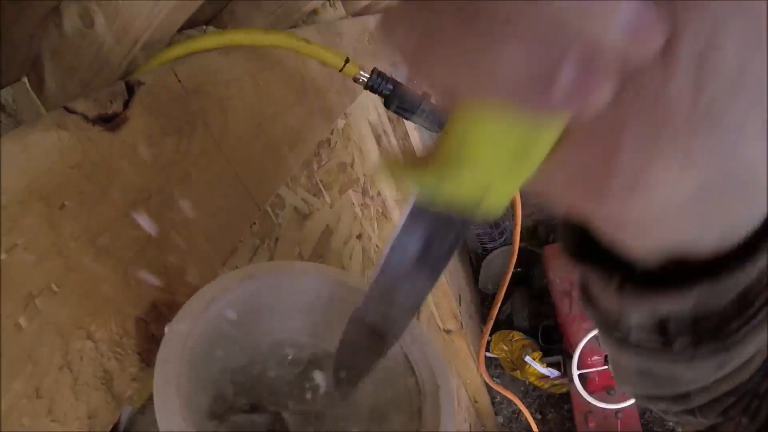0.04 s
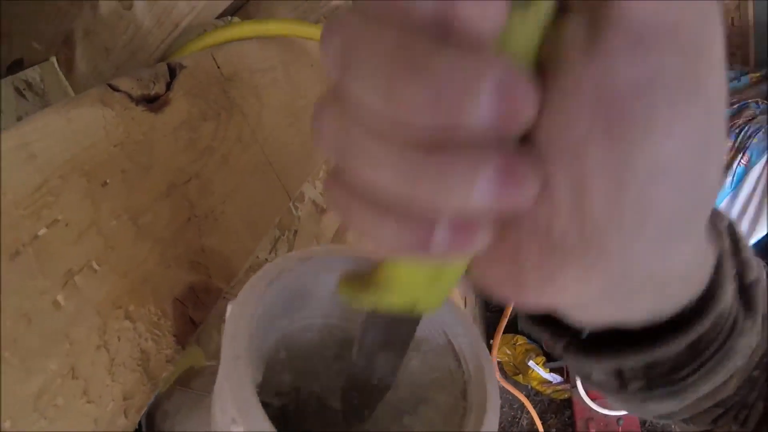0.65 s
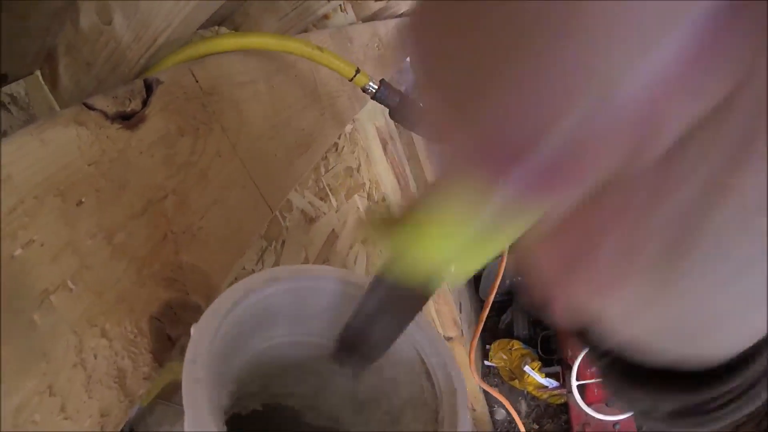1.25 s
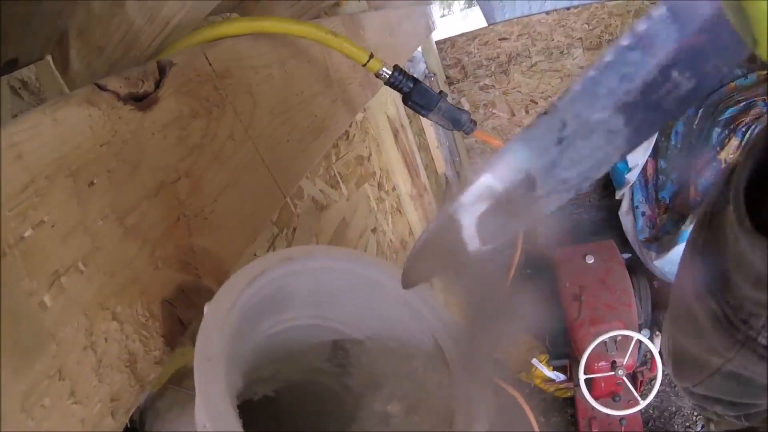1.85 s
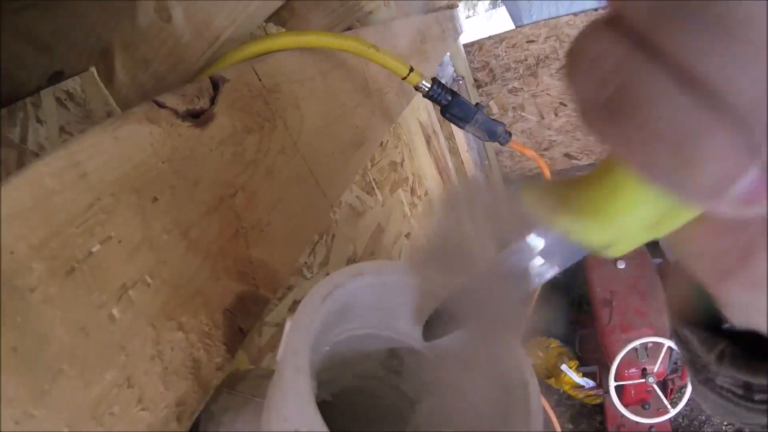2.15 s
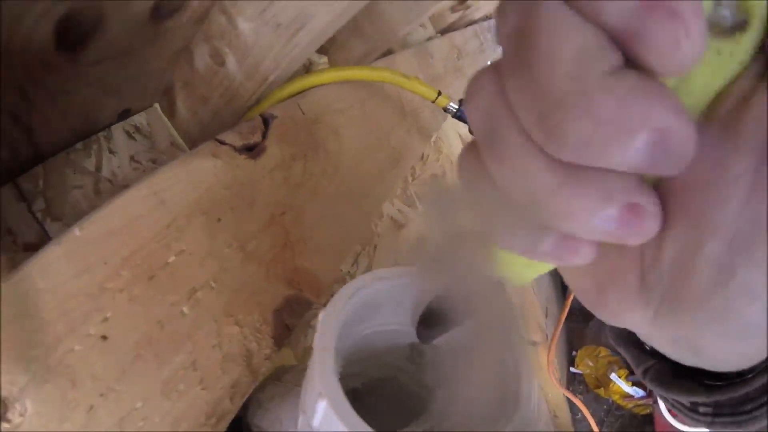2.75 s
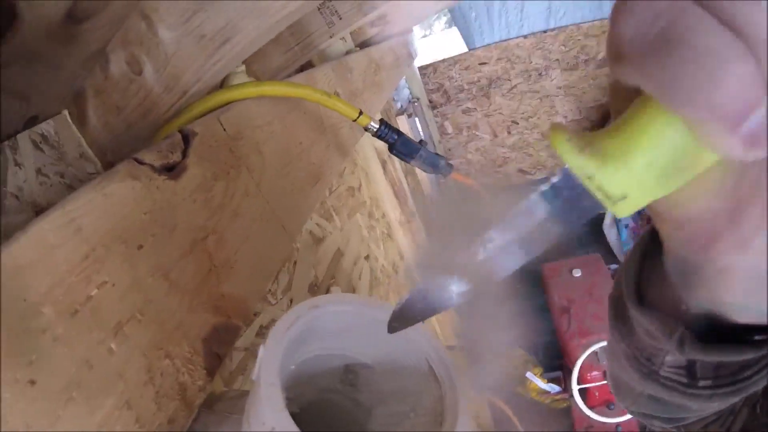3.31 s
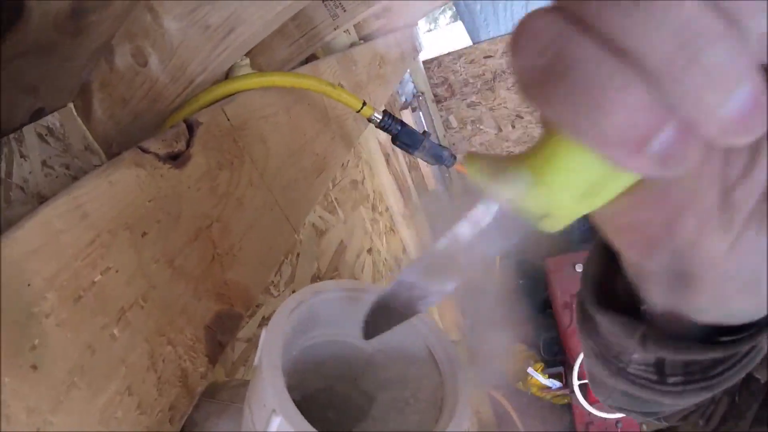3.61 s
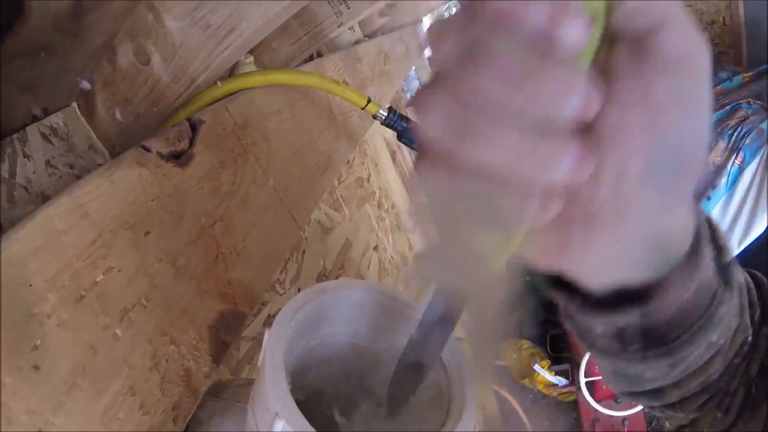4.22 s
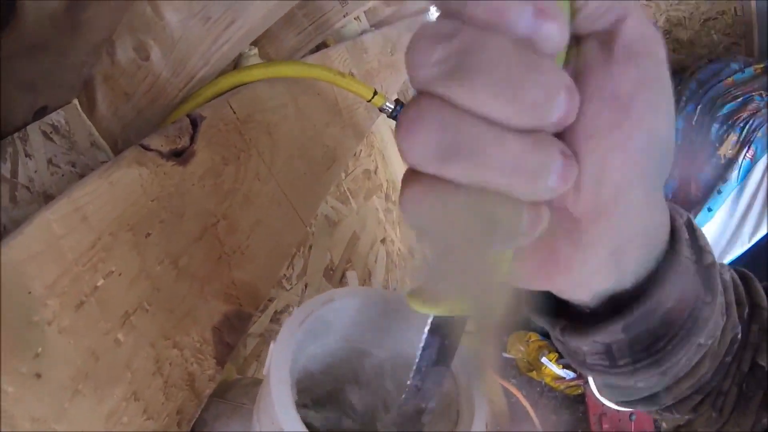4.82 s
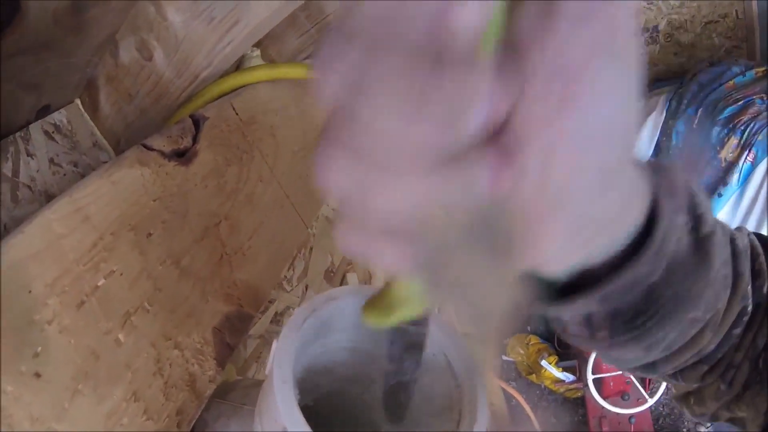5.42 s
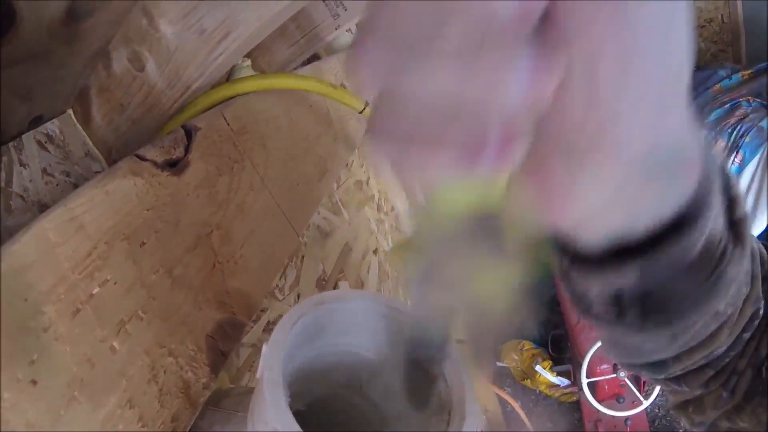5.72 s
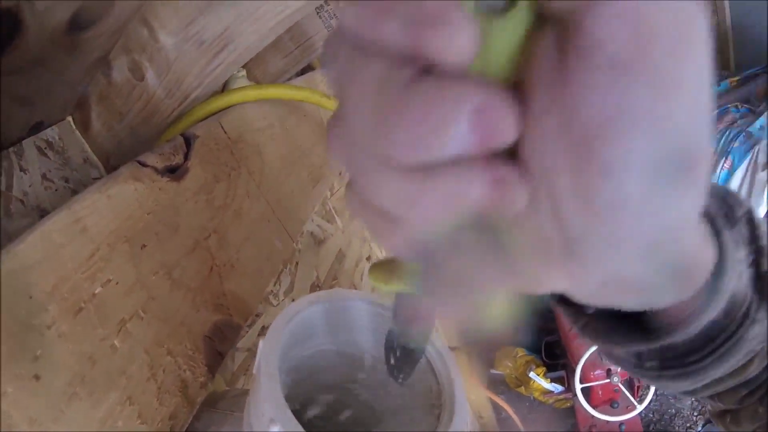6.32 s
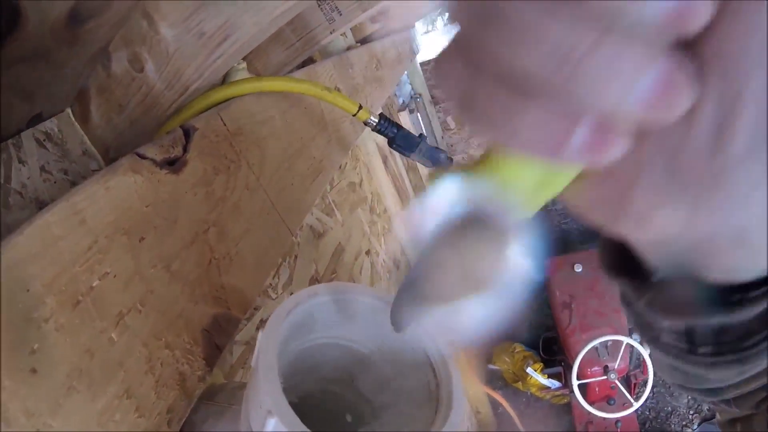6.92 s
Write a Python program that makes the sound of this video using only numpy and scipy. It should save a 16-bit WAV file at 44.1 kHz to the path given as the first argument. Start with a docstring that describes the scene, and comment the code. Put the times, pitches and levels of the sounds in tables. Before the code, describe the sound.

Close to a small camera's microphone in a quiet open shed, ice cracks and crunches under repeated knife stabs, with hollow thumps from its plastic tub and the bench beneath. Chips click and scatter, and the steel gives brief scrapes and squeaks. After seven strikes the work stops for a soft rustle of sleeve, then a longer run follows, with a very faint distant whine coming and going behind it.

```python
"""Quiet air in an open shed; at once a knife starts stabbing ice in a plastic tub on a wooden bench.
Each stab bites and crushes in a burst of tiny fractures, knocks the block and thumps tub and bench;
then splinters patter down. The blade scrapes through loose ice and squeaks as it is pulled free.
In a pause a sleeve rustles; the stabs resume, and a faint far whine comes and goes behind them.
A small camera's housing colours it all."""
import sys
import numpy as np
from scipy import signal
from scipy.fft import rfft, irfft
from scipy.io import wavfile

SR = 44100
rng = np.random.default_rng(int(sys.argv[2]) if len(sys.argv) > 2 else 0)


def put_to_file(sound):
    """Save the sound as 16-bit audio at rate SR, in the file named by the first command-line argument."""
    columns = np.atleast_2d(sound).T  # one column per channel
    safe = np.clip(columns, -1, 1)
    whole_steps = np.round(safe * 32767)
    wavfile.write(sys.argv[1], SR, whole_steps.astype(np.int16))


N = 306936


def undb(db):
    """Decibels to gain."""
    return 10 ** (np.asarray(db) / 20)


def unit(x):
    """Scale to rms 1."""
    return x / np.sqrt(np.mean(x ** 2) + 1e-20)


def add(out, s, x):
    """Mix x into out from time s."""
    i = max(int(s * SR), 0)
    out[i:i + len(x)] += x[:max(N - i, 0)]


def colour(x, points, uneven_db=0, size=4096, count=128):
    """Causal EQ through (Hz, dB) points; uneven_db adds the chance resonances of an irregular piece."""
    hz, db = np.transpose(points)
    f = np.maximum(np.arange(size // 2 + 1) * SR / size, 1)
    bumps = np.interp(f, np.linspace(0, SR / 2, count), rng.standard_normal(count))
    curve_db = np.interp(np.log(f), np.log(hz), db) + uneven_db * bumps
    cepstrum = irfft(np.log(undb(curve_db)))
    cepstrum[1:size // 2] *= 2  # fold to minimum phase: no pre-ring
    cepstrum[size // 2 + 1:] = 0
    return signal.fftconvolve(x, irfft(np.exp(rfft(cepstrum))))[:len(x)]


def drift(n, rate):
    """Random modulation with a spread near 1, gliding to a new value rate times a second."""
    at = np.arange(n) * rate / SR
    return np.interp(at, np.arange(n), rng.standard_normal(n))


def ring(t, hz, t60):
    """One decaying mode."""
    return np.sin(2 * np.pi * hz * t) * undb(-60 * t / t60)


def swell(t, middle, length):
    """A smooth rise and fall."""
    return np.exp(-(2 * (t - middle) / length) ** 2)


# Tone of the open air: (frequency [Hz], level [dB])
AIR_EQ = [(15, -16.5), (28, 8), (90, -3), (200, -14), (600, -17.5), (1600, -25), (4000, -30), (6500, -27),
          (9200, -26.5), (10600, -44), (14000, -55)]


def air():
    """A quiet bed of outdoor air, slowly swelling."""
    return unit(colour(rng.standard_normal(N), AIR_EQ)) * undb(-64 + 2 * drift(N, 4))


# Crisp top layer of breaking ice: (frequency [Hz], level [dB])
ICE_BRIGHT_EQ = [(2500, -58), (3900, -21), (4600, 1), (7000, -0.5), (9200, -3.5), (9900, -14.5),
                 (10700, -25.5), (13000, -37.5), (15000, -94)]
# Crunchy body layer of breaking ice: (frequency [Hz], level [dB])
ICE_BODY_EQ = [(120, -1.5), (350, -6.5), (650, -8), (1050, -8), (1550, 1.5), (1950, 0), (2800, 1.5),
               (3400, -1), (3900, 1.5), (4700, -12), (7000, -29.5)]
UNEVEN_DB = 2.5  # how strongly each piece of ice rings at its own pitches


def fracture(length, bright_db, body_db, change_db, grain_db, bright_t60, body_t60, rise_s,
             uneven_db=UNEVEN_DB, count=96, gap_s=.003, fall_db_per_s=2200.5):
    """A run of tiny, sudden breaks while the ice gives way; top and body then each die at their pace."""
    t = np.arange(int((length + body_t60) * SR)) / SR
    gaps = rng.uniform(.3, 1.7, count)
    sizes = np.clip(rng.standard_normal(count), -1.5, 1.5)
    starts = gap_s * (np.cumsum(gaps) - gaps)
    pressed = np.minimum(t, length)
    latest = np.searchsorted(starts, pressed, side="right") - 1
    age = pressed - starts[latest]
    force = undb(change_db * pressed / length + grain_db * sizes[latest] - fall_db_per_s * age)
    force *= 1 - np.exp(-t / min(rise_s, length / 5))  # pressure builds as the point digs in
    out = 0
    for eq, db, t60 in (ICE_BRIGHT_EQ, bright_db, bright_t60), (ICE_BODY_EQ, body_db, body_t60):
        grains = rng.standard_normal(len(t)) * force * undb(-60 * (t - pressed) / t60)
        burst = colour(grains, eq, uneven_db, size=1024)
        out = out + burst * undb(db) / np.sqrt(np.mean(burst[t < length + .001] ** 2))
    return out


def snap(length, bright_db, body_db):
    """One piece breaks; the smallest snaps are the driest."""
    t60 = min(.011 + 3.7 * length, .036)
    return fracture(length, bright_db, body_db, change_db=-3.5, grain_db=3, bright_t60=t60,
                    body_t60=1.43 * t60, rise_s=.00026, uneven_db=1.23 * UNEVEN_DB)


# Knife hits, which also cue the knocks, thumps and splinters: (time [s], crush length [s],
# bright level [dB], body level [dB], bite over crush [dB], thump [dB], boom [dB], splinters [dB])
STABS = [(.078, .028, -27.5, -32.5, 3, -37, -46.5, -49.5), (.377, .023, -24, -31, -6, -43.5, -50.5, -44.5),
         (.688, .021, -27.5, -32, 1.5, -45, -52.5, -51), (1.045, 0.019, -30.5, -33.5, 6, -35, -43.5, -52),
         (1.376, .02, -27, -32, 7.5, -41.5, -57, -51), (1.705, 0.0099, -37.5, -32.5, 3, -34, -32.5, -52.5),
         (2.089, 0.0038, -35, -27, 4, -32, -33.5, -62), (3.509, 0.025, -33, -36, 8, -54, -58, -52),
         (3.838, .031, -34, -37, -6.5, -42.5, -48, -62.5), (4.213, .022, -25.5, -32, 0, -40, -52, -46.5),
         (4.581, 0.036, -27, -32.5, -0.5, -40.5, -48, -57.5), (4.913, .023, -26, -29, 2, -32.5, -40, -55.5),
         (5.227, .021, -25, -32, -9, -42, -44, -55), (5.521, 0.04, -26.5, -33.5, -7, -37.5, -44, -48.5),
         (5.848, .018, -25.5, -30, -6, -39.5, -46, -64), (6.115, 0.0099, -25.5, -30, -10, -38, -44, -62),
         (6.401, .009, -25, -33, 4, -41, -45, -69.5),
         (6.656, 0.0098, -33.5, -36.5, -3.5, -34, -37.5, -67.5),
         (6.925, 0.0089, -36, -34.5, 6.5, -29, -36.5, -47)]


def stabs(graze_s=.0025, graze_db=-27, bite_s=.0031, bite_body_db=-4):
    """The tip grazes loose frost, bites with a thin snap and crushes the ice."""
    out = np.zeros(N)
    for s, length, bright_db, body_db, bite_db, *_ in STABS:
        add(out, s - graze_s, snap(graze_s, bright_db + graze_db, body_db + graze_db))
        add(out, s, snap(bite_s, bright_db + bite_db, body_db + bite_db + bite_body_db))
        sag_db = -2.5 - .28 * bite_db  # the crush fades more after a hard bite
        add(out, s, fracture(length, bright_db, body_db, change_db=sag_db, grain_db=3,
                             bright_t60=.039, body_t60=.043, rise_s=.0012))
    return out


# Modes of the tub's wall and hollow: (frequency [Hz], gain [dB], decay to -60 dB [s])
TUB_MODES = [(579.7, 0.5, 0.2), (971, -5, 0.27), (1370, -3, 0.055), (1613, -2.5, 0.063), (1960, -8, 0.27),
             (2720, -3, 0.17), (2940, -2.5, 0.21)]


def tub(x):
    """The plastic wall and the hollow above the ice ring on after each crack."""
    t = np.arange(SR // 5) / SR
    response = sum(undb(db) * ring(t, hz, t60) * 2 * np.log(1000) / (t60 * SR)
                   for hz, db, t60 in TUB_MODES)
    return x + signal.fftconvolve(x, response)[:N]


def shed(x, t60=.18, wet_db=-19, gap_s=.007):
    """Boards close by return a short reverb tail."""
    t = np.arange(SR // 2) / SR
    tail = rng.standard_normal(len(t)) * undb(-60 * t / t60) * (1 - np.exp(-(t / gap_s) ** 2))
    echo = signal.fftconvolve(x, unit(tail) / np.sqrt(len(t)))[:N]
    return x + undb(wet_db) * colour(echo, [(200, 19.5), (1500, 1), (3000, 4), (6000, -6), (11000, -5.5)])


# Pings of ice plates: (time [s], pitch [Hz], level [dB], decay to -60 dB [s])
PLATE_PINGS = [(.093, 1514, -34, 0.044), (.392, 2185, -31.5, 0.065), (1.39, 2930, -36.5, 0.087),
               (1.493, 2706, -31, .045), (1.707, 2784, -35, .08), (1.846, 1968, -42.5, .12),
               (2.089, 3765, -19.5, .021), (2.089, 933, -19.5, 0.02), (2.089, 616, -26.5, 0.03),
               (2.288, 1390, -42.5, 0.032), (4.603, 2736, -28.5, .055), (4.6, 625, -35.5, 0.083),
               (4.916, 1645, -18.5, 0.037), (5.852, 1556, -23, 0.054), (6.576, 1350, -44.5, 0.046),
               (6.931, 1790, -20.5, 0.011)]


def plates():
    """Struck plates of ice ring briefly, with a rough flutter."""
    out, t = np.zeros(N), np.arange(SR // 4) / SR
    for s, hz, db, t60 in PLATE_PINGS:
        add(out, s, undb(db) * ring(t, hz, t60) * (1 + .46 * drift(len(t), 300)))
    return out


# Hollow tone of the ice block: (frequency [Hz], level [dB])
KNOCK_EQ = [(150, -13), (330, -4.5), (550, 1.5), (950, -5), (1300, -4.5), (2500, -30), (5000, -64.5)]
STOP_SHARE = .6  # how far through the crush the blade meets solid ice


def knocks(t60=.087, trim_db=-2.5, steepness=1.22):
    """The blade meets solid ice and the whole block knocks; the knock grows faster than the boom."""
    out, t = np.zeros(N), np.arange(SR // 4) / SR
    hardest_db = max(boom_db for *_, boom_db, _ in STABS)
    for s, length, *_, boom_db, _ in STABS:
        knock = colour(rng.standard_normal(len(t)) * undb(-60 * t / t60), KNOCK_EQ, UNEVEN_DB)
        db = hardest_db + trim_db + steepness * (boom_db - hardest_db)
        add(out, s + STOP_SHARE * length, knock * undb(db) / np.std(knock[t < .02]))
    return out


# Modes of tub and bench together: (frequency [Hz], level [dB], decay to -60 dB [s])
BENCH_MODES = [(129.3, -9, 0.5), (162.24, 5, 0.33), (177, -0.5, 0.27), (228, -2.5, 0.14),
               (282.4, -4.5, 0.24), (340, -13.5, 0.11), (435, -15.5, 0.25), (567, -11, 0.22)]
# Low end of the boom, and of the camera's rumble: (frequency [Hz], level [dB])
BOOM_EQ = [(15, -34.5), (30, -5), (55, 2), (85, 2.5), (130, -2), (190, -3), (300, -15.5), (600, -25.5),
           (1200, -62)]


def thumps(lag_s=.004, push_s=.0025, boom_t60=.6):
    """The stopped blade shoves tub and bench: their modes ring over a loose, low boom."""
    out, t = np.zeros(N), np.arange(SR * 3 // 4) / SR
    for s, length, *_, thump_db, boom_db, _ in STABS:
        chance = rng.standard_normal((len(BENCH_MODES), 2))
        modes = sum(undb(db + 2.97 * accent) * ring(t, hz * (1 + .029 * detune), t60)
                    for (hz, db, t60), (accent, detune) in zip(BENCH_MODES, chance))
        modes *= 1 - np.exp(-t / push_s)
        modes *= undb(thump_db) / np.std(modes[t < .08])
        boom = colour(rng.standard_normal(len(t)) * undb(-60 * t / boom_t60), BOOM_EQ)
        boom *= undb(boom_db) / np.std(boom[t < .12])
        add(out, s + lag_s + STOP_SHARE * length, modes + boom)
    return out


def splinters(count=20, fall_s=.26, spread_db=5, fade_db_per_s=52, clink_hz=3580, clink_db=-1.5):
    """Splinters patter down after each stab, ever more softly; heavier ones clink lower."""
    out, t = np.zeros(N), np.arange(SR // 10) / SR
    for s, length, *_, spray_db in STABS:
        delays = fall_s * (np.arange(count) + rng.random(count)) / count
        for delay, (size, weight) in zip(delays, np.clip(rng.standard_normal((count, 2)), -2, 2)):
            db = spray_db - fade_db_per_s * delay + spread_db * size
            tick = fracture(.0025, db, db - 7.5 + 3 * weight, change_db=-4, grain_db=.5,
                            bright_t60=.055, body_t60=.043, rise_s=.00019)
            clink = undb(db + clink_db) * ring(t, clink_hz * 2 ** (-.5 * weight), t60=.04)
            add(out, s + length + delay, tick)
            add(out, s + length + delay, clink)
    return out


# Single clicks of ice: (time [s], length [s], bright level [dB], body level [dB])
CHIP_CLICKS = [(0.137, 0.0078, -45, -49.5), (0.158, 0.0089, -44.5, -62.5), (0.479, 0.0026, -33, -39),
               (.536, 0.0043, -37.5, -49), (0.6, 0.0084, -39, -52), (0.68, .003, -46, -50),
               (.789, .004, -41, -43.5), (.796, 0.0029, -34, -39), (.901, .014, -54, -64),
               (1.066, 0.0081, -39.5, -33), (1.125, .002, -42, -48), (1.489, 0.0083, -44, -39.5),
               (1.546, .005, -68, -48), (1.647, 0.0055, -46, -49.5), (1.923, 0.0091, -54.5, -54.5),
               (1.961, .007, -56, -50), (2.219, .004, -68, -54), (2.253, .005, -53, -57),
               (2.285, 0.0033, -56, -47), (2.416, 0.0091, -57, -51.5), (3.089, 0.0044, -67, -50),
               (3.129, .009, -57.5, -61), (3.524, 0.0023, -30.5, -34.5), (3.597, 0.00079, -48, -45.5),
               (3.634, .007, -50, -64), (3.886, 0.0058, -47.5, -42), (4.257, .003, -31, -45),
               (4.273, 0.0017, -26, -44), (4.291, 0.0012, -28.5, -38.5), (4.323, 0.008, -35.5, -43.5),
               (4.338, 0.0035, -36, -44), (4.417, 0.0066, -45, -54.5), (4.542, 0.009, -44.5, -54.5),
               (4.691, .012, -32.5, -40), (4.75, 0.01, -46, -50.5), (4.863, .005, -52, -51),
               (5.088, 0.0074, -29, -44.5), (5.294, .002, -37, -43.5), (5.3, .004, -32, -43),
               (5.428, 0.0087, -50.5, -66), (5.563, 0.0076, -38, -46), (5.63, 0.0049, -36.5, -44.5),
               (5.745, 0.016, -48, -62.5), (5.906, 0.018, -45.5, -46), (6.161, 0.0083, -46.5, -50),
               (6.576, 0.011, -57.5, -47.5)]


def chips():
    """Chips of ice click as they snap off or land."""
    out = np.zeros(N)
    for s, length, bright_db, body_db in CHIP_CLICKS:
        add(out, s, snap(length, bright_db, body_db))
    return out


# Drags of the blade: (time [s], length [s], bright level [dB], body level [dB])
SCRAPES = [(1.085, 0.05, -55, -51), (1.75, .037, -68, -49), (1.829, .048, -55.5, -46.5),
           (2.55, .024, -53, -42), (2.618, 0.032, -58.5, -58.5), (3.665, .06, -56.5, -67),
           (4.24, .022, -40, -37.5), (4.461, 0.029, -52, -53.5), (5.025, 0.0186, -56, -59),
           (5.111, 0.054, -57, -60.5), (5.31, 0.018, -44, -50), (6.687, 0.038, -59, -54.5)]


def scrapes():
    """The blade drags through loose ice in a coarse run of tiny breaks."""
    out = np.zeros(N)
    for s, length, bright_db, body_db in SCRAPES:
        add(out, s, fracture(length, bright_db, body_db, change_db=-.5, grain_db=4.5,
                             bright_t60=.056, body_t60=.069, rise_s=.0015, uneven_db=3))
    return out


# The blade rubs in its cut; a negative scoop starts sharp, a negative sag rises:
# (time [s], length [s], slip rate [Hz], scoop [share of rate], sag [share of rate], level [dB])
SQUEAKS = [(1.152, 0.054, 1340, 0.26, .1, -44.5), (1.203, 0.059, 900, -.14, .09, -45.5),
           (2.114, 0.042, 1300, 0.062, -.04, -42.5), (2.551, 0.039, 1396, 0.067, 0.0091, -40)]
# Resonances of the blade: (frequency [Hz], level [dB])
BLADE_EQ = [(400, -19), (850, -10), (1300, 7), (1800, -5), (2600, 1.5), (3700, -2.5), (5000, -15),
            (9000, -18.5), (12000, -52)]


def squeaks(jitter=.022, grit=.75, flutter_db=3, settle_s=.007, attack_s=.012, release_s=.02):
    """Steel sticks and slips on ice: a gliding harmonic tone, gritty at each slip, shaped by the blade."""
    out = np.zeros(N)
    for s, length, hz, scoop, sag, db in SQUEAKS:
        t = np.arange(int(length * SR)) / SR
        slip_hz = hz * (1 - scoop * np.exp(-t / settle_s) - sag * t / length)
        phase = 2 * np.pi * np.cumsum(slip_hz * (1 + jitter * drift(len(t), 668))) / SR
        tone = unit(sum(np.sin(k * phase) for k in range(1, 7)))
        rasp = unit(rng.standard_normal(len(t)) * (1 + np.cos(phase)))
        grip = np.minimum(t / attack_s, 1) * np.minimum((length - t) / release_s, 1)
        squeak = unit(colour(tone + grit * rasp, BLADE_EQ))
        add(out, s, squeak * grip * undb(db + flutter_db * drift(len(t), 150)))
    return out


# Arm moves: (peak time [s], length [s], swish level [dB], rumble level [dB])
ARM_MOVES = [(2.42, 0.26, -68.5, -59.5), (2.79, 0.49, -55, -54), (2.971, 0.079, -57, -74),
             (3.15, 0.2, -64, -60), (3.39, 0.17, -77, -63.5)]
# Tone of sliding cloth: (frequency [Hz], level [dB])
CLOTH_EQ = [(200, -11), (450, -4), (820, -6), (1100, -5.5), (1700, -5), (2600, -14), (3300, -13.5),
            (5400, -14.5), (7000, -15.5), (9300, -21.5), (10500, -44), (14000, -56)]
# Catches of the cloth: (peak time [s], length [s], frequency [Hz], level [dB])
CLOTH_RASPS = [(2.76, 0.14, 1460, -60), (2.978, 0.087, 1880, -47.5), (3.102, 0.027, 850, -53),
               (3.208, 0.14, 790, -63.5), (3.207, 0.058, 1880, -60)]


def sleeve(count=6):
    """Folds of cloth take turns to slide, rasping where they catch; the camera rumbles with the arm."""
    t = np.arange(N) / SR
    swish = sum(undb(db) * swell(t, middle, length) for middle, length, db, _ in ARM_MOVES)
    rumble = sum(undb(db) * swell(t, middle, length) for middle, length, _, db in ARM_MOVES)
    folds = sum(colour(rng.standard_normal(N), CLOTH_EQ, uneven_db=2.5) * np.abs(drift(N, 30))
                for _ in range(count))
    out = unit(folds * undb(1.6 * drift(N, 250))) * swish
    fibres = rng.standard_normal(N)
    for middle, length, hz, db in CLOTH_RASPS:
        rasp = unit(signal.lfilter(*signal.iirpeak(hz, Q=8, fs=SR), fibres))
        out += rasp * undb(db) * swell(t, middle, length)
    return out + unit(colour(rng.standard_normal(N), BOOM_EQ)) * rumble


# Distant whines: (time [s], length [s], top pitch [Hz], level [dB])
WHINES = [(4.4, .15, 591, -67), (5.35, .22, 630, -63), (5.63, .23, 605, -64), (5.93, .26, 652, -66),
          (6.296, 0.1, 545, -66)]


def whines(bend=.071, waver=.05, flutter_db=4):
    """A faint far tone wavers as it arches up and back down in pitch and level."""
    out = np.zeros(N)
    for s, length, hz, db in WHINES:
        n = int(length * SR)
        arch = np.sin(np.pi * np.arange(n) / n)
        pitch_hz = hz * (1 - bend * (1 - arch) + waver * drift(n, 190))
        phase = 2 * np.pi * np.cumsum(pitch_hz) / SR
        add(out, s, np.sin(phase) * arch * undb(db + flutter_db * drift(n, 23.5)))
    return out


def scene():
    """The mono mix: ice rings the tub, and both join the blade in the shed's reverb; the rest is dry."""
    ice = stabs() + chips() + plates() + splinters() + knocks()
    in_shed = shed(tub(ice) + squeaks() + scrapes())
    return (in_shed + thumps() + sleeve() + air() + whines())[None]


# Peaks and dips of the camera housing: (frequency [Hz], width [Hz], gain [dB])
HOUSING_EQ = [(5030, 250, 4), (5363, 317, 6.5), (6050, 850, -7), (6486, 297, 10.5), (7780, 230, -4),
              (8900, 700, 0.5)]


def record(dry):
    """The housing rings in the treble; the sharpest peaks are rounded and the very top is cut."""
    for hz, width, db in HOUSING_EQ:
        w, gain = 2 * np.pi * hz / SR, undb(db)
        damping = np.sin(w) * width / hz / 2
        feedforward = [1 + damping * gain, -2 * np.cos(w), 1 - damping * gain]
        feedback = [1 + damping, -2 * np.cos(w), 1 - damping]
        dry = signal.lfilter(feedforward, feedback, dry)
    rounded = .7 * np.tanh(dry[0] / .7)
    softened = colour(rounded, [(10500, 0), (12500, -3), (14500, -14)])
    high_cut = signal.ellip(8, .2, 70, 14400, fs=SR, output="sos")
    return signal.sosfilt(high_cut, softened)[None]


dry = scene()
out = record(dry)
put_to_file(out)
```